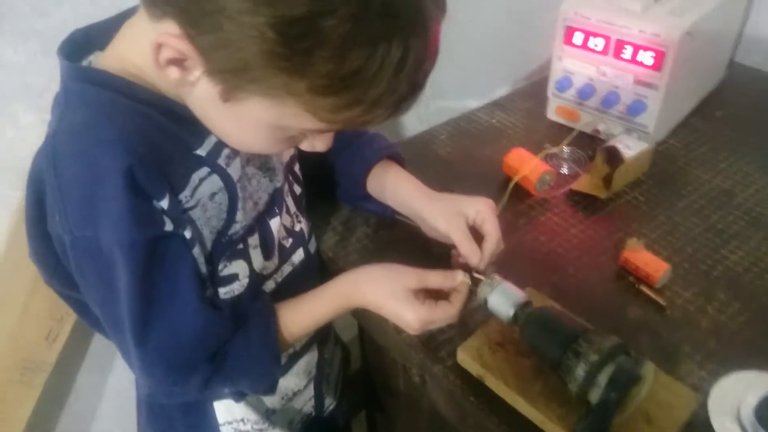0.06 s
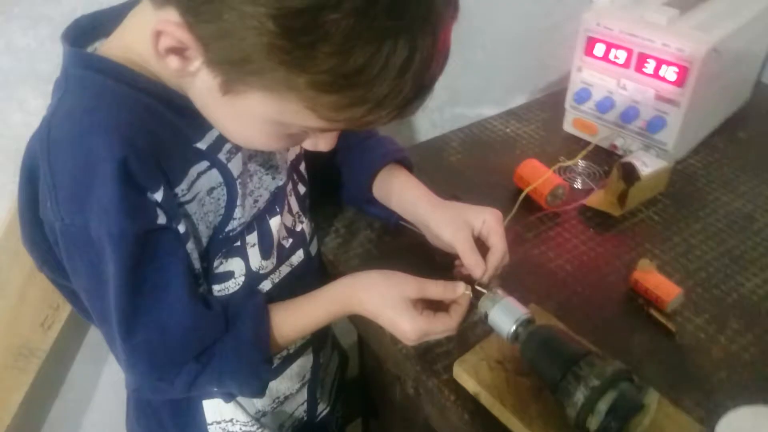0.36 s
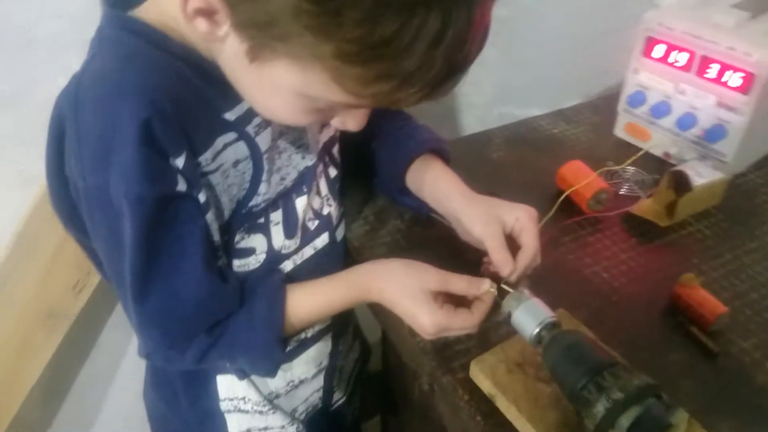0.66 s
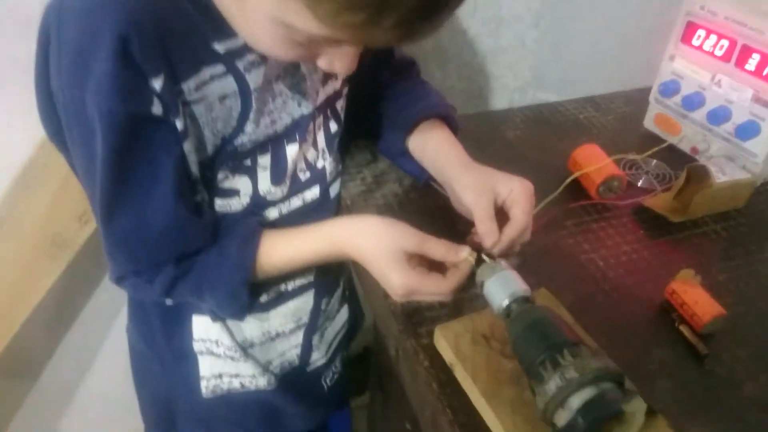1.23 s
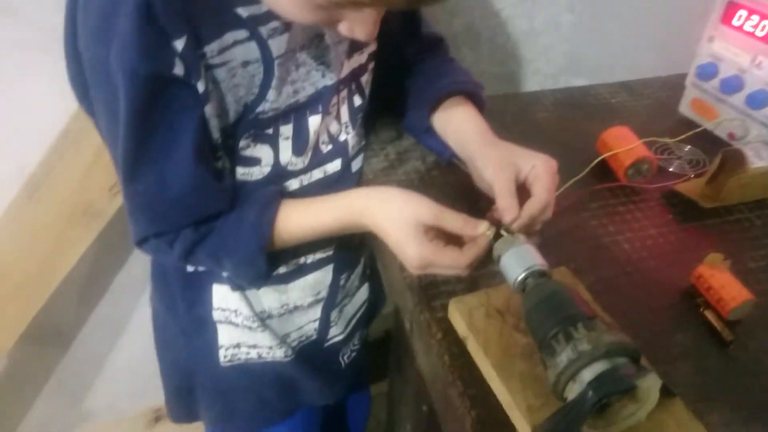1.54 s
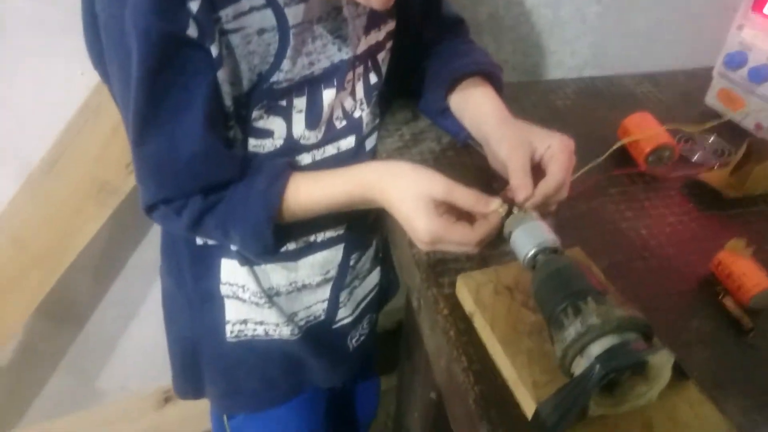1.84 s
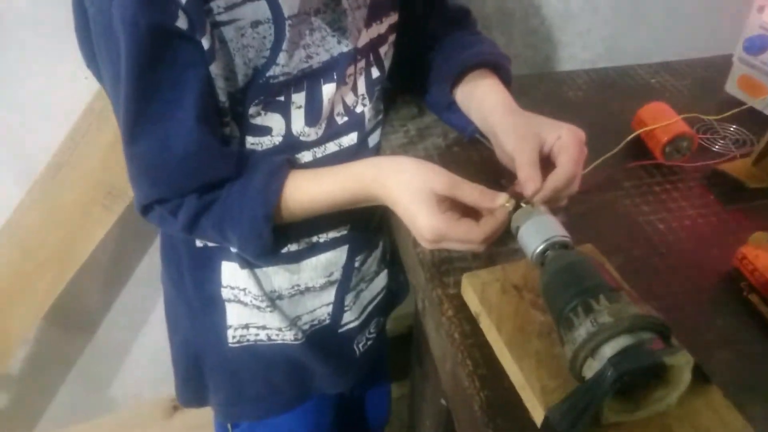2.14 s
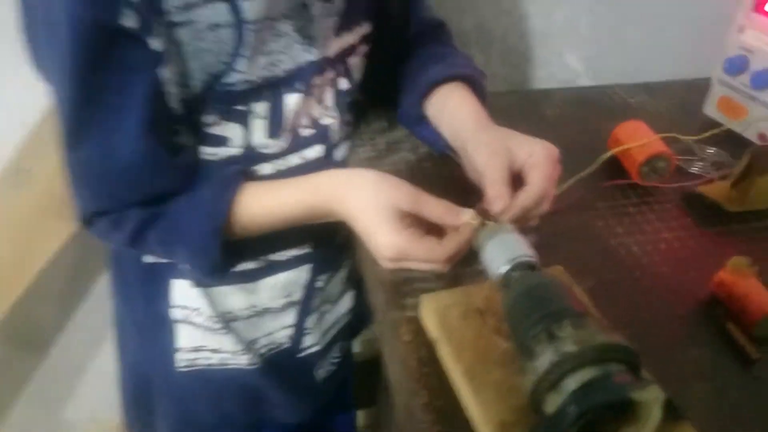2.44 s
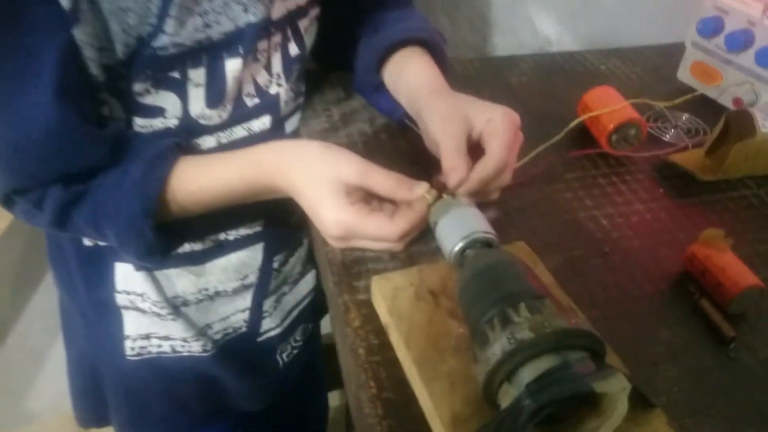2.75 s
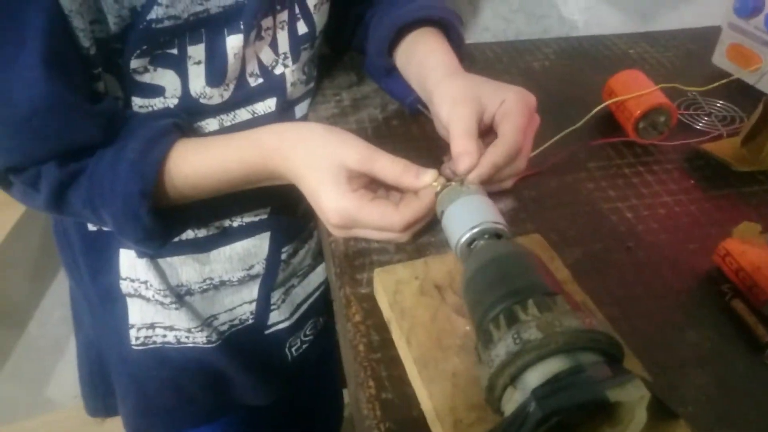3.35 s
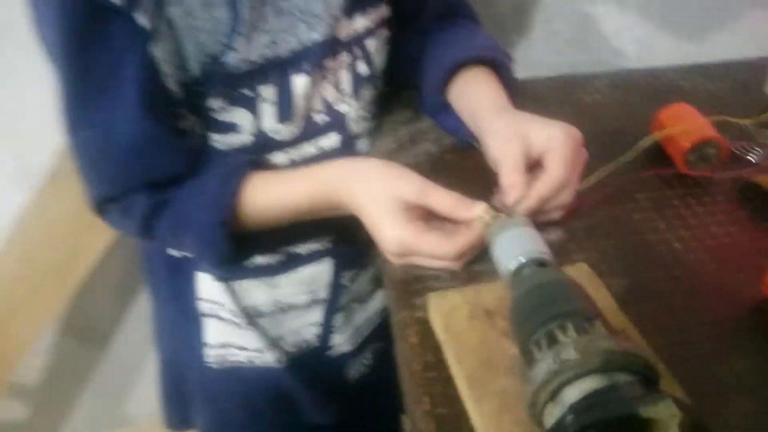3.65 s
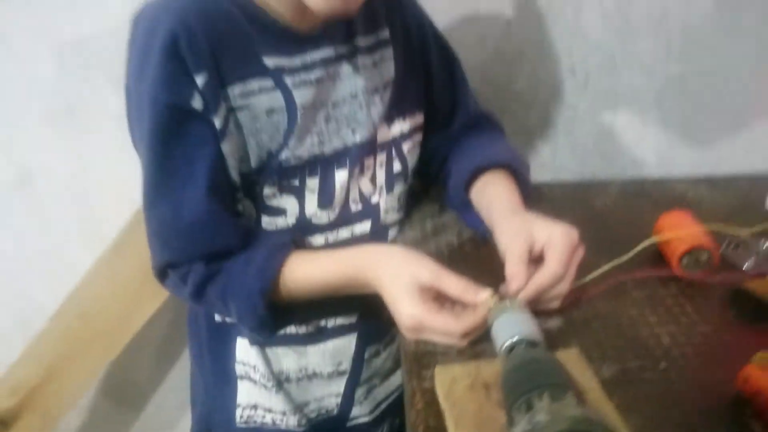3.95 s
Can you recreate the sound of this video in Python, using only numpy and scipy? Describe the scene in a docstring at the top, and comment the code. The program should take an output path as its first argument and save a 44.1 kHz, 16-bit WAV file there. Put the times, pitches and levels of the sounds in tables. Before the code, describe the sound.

Continuous hissing friction from a small piece pressed to a rotating tool tip, over faint whirring.

```python
"""A loud, bright friction rasp comes from a small part held to the tip of a geared motor tool on a bench.
The shafts slowly gather speed and modulate the friction noise, which excites broad resonances and
narrow metallic rings. Motor and gears hum at multiples of the rotation rate, over a faint rumble.
The moving microphones hear different colours left and right, and a limiter holds down the peaks."""
import sys
import numpy as np
from scipy import signal
from scipy.fft import rfft, irfft, next_fast_len
from scipy.io import wavfile
from scipy.ndimage import uniform_filter1d, minimum_filter1d, map_coordinates

SR = 44100
rng = np.random.default_rng(int(sys.argv[2]) if len(sys.argv) > 2 else 0)


def to_wav(sig):
    """Store sig (one row per channel, or 1-D mono) as 16-bit WAV at the path in sys.argv[1].

    Samples outside -1..1 are clipped; the rate is SR.
    """
    pcm = np.clip(np.atleast_2d(sig), -1, 1) * 32767
    pcm = np.round(pcm).astype(np.int16)
    wavfile.write(sys.argv[1], SR, pcm.T)  # frames by channels


N = 176400
GEAR_RATIO = 0.287  # turns of the gear shaft per motor turn


def amp(db):
    """Amplitude ratio of a level in decibels."""
    return 10 ** (np.asarray(db) / 20)


def unit(x):
    """Normalisation to an rms of 1."""
    return x / np.sqrt(np.mean(x ** 2) + 1e-20)


def along(rows, hz, column=1):
    """Interpolation of one table column on a logarithmic frequency axis."""
    columns = np.transpose(rows)
    return np.interp(np.log(hz + 1), np.log(columns[0] + 1), columns[column])


def curve(rows):
    """Linear interpolation of (seconds, value) rows to one value per sample."""
    return np.interp(np.arange(N) / SR, *np.transpose(rows))


def wobble(rate):
    """Slow random modulation: a spline through `rate` Gaussian values a second."""
    return map_coordinates(rng.standard_normal(8192), [np.arange(N) * rate / SR], mode="wrap")


def filtered(x, response):
    """Zero-phase filtering: the spectrum is multiplied by a function of frequency."""
    size = next_fast_len(N + SR // 4)
    return irfft(rfft(x, size) * response(np.fft.rfftfreq(size, 1 / SR)), size)[..., :N]


def rumble():
    """Faint low noise, lumpy from amplitude modulation and mostly in antiphase between the microphones."""
    # Rumble spectrum. Each row: frequency in Hz, relative level in dB.
    spectrum = [(10, -19), (40, -1.5), (68, -1), (95, -4), (170, -7.5), (280, -23), (600, -58), (2000, -90)]
    antiphase = rng.standard_normal(N) * np.array([[-1], [1]])
    independent = amp(-3.5) * rng.standard_normal((2, N))
    noise = filtered(antiphase + independent, lambda hz: amp(along(spectrum, hz)))
    return amp(-55) * unit(noise * amp(5.5 * wobble(rate=22)))


def hum(turns):
    """Rotational orders: motor and gear tones lie at fixed multiples of the speed and rise with it."""
    # Envelopes of the motor's fundamental, the gear shaft's tone and the third-order whine.
    # Each row: time in seconds, level on the right in dB.
    motor_db = [(0, -57), (.18, -48), (.6, -44.5), (.67, -52), (.78, -43.5), (1.2, -52.5), (1.55, -51),
                (1.78, -50), (1.86, -44.5), (2.4, -45), (3.25, -48), (3.6, -53), (4, -56)]
    gear_db = [(0, -90), (2.1, -71), (2.9, -53), (3.35, -51), (3.48, -69), (3.65, -49.5), (4, -48)]
    whine_db = [(0, -50), (0.9, -48.5), (1.6, -50), (2.0, -51), (2.5, -47), (3.2, -45.5), (3.65, -43),
                (4, -40)]

    def tone(order, jitter_rad):
        """One order, roughened by random phase and amplitude modulation."""
        phase = 2 * np.pi * order * turns + jitter_rad * wobble(rate=45)
        return unit(np.sin(phase) * amp(2 * wobble(rate=15)))

    motor = amp(curve(motor_db)) * tone(1, jitter_rad=0.1)
    overtone = amp(-53) * tone(1.8, jitter_rad=0.49)
    gear = amp(curve(gear_db)) * tone(GEAR_RATIO, jitter_rad=0.22)
    whine = amp(curve(whine_db)) * unit(tone(3, jitter_rad=0.45) * amp(3 * wobble(rate=14)))
    sides = np.array([[-amp(-8)], [1]])  # weaker and inverted on the left
    return (motor + overtone + gear) * sides + whine * amp([[-18], [0]])


def mode(hz, width_hz):
    """A lightly damped mode driven by friction gives narrow-band noise around its natural frequency."""
    phase = 2 * np.pi * np.cumsum(hz) / SR
    return unit(wobble(width_hz) * np.sin(phase) + wobble(width_hz) * np.cos(phase))


def ringing():
    """Metal modes swell and fade as the contact changes; later the tip's close modes take over."""
    # The tip's modes. Each row: frequency in Hz at 3 seconds, relative level in dB.
    tip_modes = [(3235, -13), (3342, -1), (3455, -1), (3572, 0), (3685, -7)]
    # Their common envelope. Each row: time in seconds, gain in dB.
    tip_db = [(0, -60), (2.2, -50), (2.5, -30), (2.72, -26), (3.0, -29.5), (3.6, -28.5), (3.66, -22.5),
              (3.88, -22.5), (4, -25.5)]
    # Passing rings. Each row: time of the peak in seconds, duration above half amplitude in seconds,
    # frequency in Hz, drift in Hz per second, width in Hz, peak level in dB, left minus right in dB.
    rings = [(1.7, 4.5, 540, 0, 32, -55, -20), (0.3, 1.1, 1830, -20, 30, -37, -16),
             (0.3, 0.9, 2310, 0, 90, -36, -14), (0.35, 0.25, 3580, 0, 40, -28, -12),
             (0.88, 0.3, 9205, 0, 45, -26, 12), (1.3, 1.2, 1522, 0, 28, -41, -16),
             (1.5, 1.0, 3730, 0, 70, -30, -14), (1.6, 0.6, 2378, 0, 22, -26.5, -12),
             (2.05, 0.6, 2690, 0, 40, -36, -14), (2.0, 0.6, 2850, 0, 50, -36, -14),
             (2.2, 0.6, 2055, 70, 26, -36, -16), (2.55, 0.6, 2545, 0, 55, -34, -14),
             (3.45, 0.25, 9650, 0, 60, -28, 12), (3.6, 0.8, 2620, 0, 55, -35, -14)]
    t = np.arange(N) / SR
    tip_drift_hz = 55 * (t - 3)
    tip = sum(amp(db) * mode(hz + tip_drift_hz, width_hz=22) for hz, db in tip_modes)
    sound = tip * amp(curve(tip_db)) * amp([[-14], [0]])
    for peak_s, length_s, hz, drift, width_hz, db, pan_db in rings:
        swell = 0.5 ** ((2 * (t - peak_s) / length_s) ** 2)
        sides = amp([[min(pan_db, 0)], [min(-pan_db, 0)]])
        sound += amp(db) * swell * mode(hz + drift * (t - peak_s), width_hz) * sides
    return sound


def scraping(turns):
    """Two independent friction noises, amplitude-modulated by both shafts and by uneven contact."""
    motor_angle = 2 * np.pi * turns
    gear_angle = GEAR_RATIO * motor_angle
    throb = 1 + 0.26 * np.cos(motor_angle) + 0.058 * np.cos(gear_angle) + 0.092 * np.cos(2 * gear_angle)
    noise = rng.standard_normal((2, N))
    chatter = amp(0.65 * wobble(rate=64))
    return unit(noise * throb * chatter)


def reflections(x, ripple_db=2.6):
    """Interference of reflections, as random spectral peaks and dips that drift as the microphones move."""
    spectra = signal.stft(x, nperseg=2048)[2]
    ripple = uniform_filter1d(rng.standard_normal(spectra.shape), size=2, axis=1)  # over frequency
    ripple = uniform_filter1d(ripple, size=34, axis=2)  # over time
    return unit(signal.istft(spectra * amp(ripple_db * unit(ripple)))[1][:, :N])


def across_bands(curves, hz):
    """Linear interpolation over frequency between twelve time curves, one per band of the rasp."""
    # The bands, from low to high. Each entry: centre frequency in Hz.
    centres_hz = [800, 1600, 2050, 2600, 3050, 3550, 5100, 6750, 8200, 9700, 10500, 12300]
    weights = [np.interp(hz, centres_hz, pick) for pick in np.eye(len(curves))]
    return np.transpose(weights) @ np.array(curves)


def rasp(turns):
    """Source and filter: friction noise passes through the tool's resonances, which swell and drift."""
    # Colour at the microphones. Each row: frequency in Hz, left and right relative levels in dB.
    colour = [(100, -93, -97), (245, -85, -83), (320, -77, -75), (477, -80.5, -75.5), (610, -77.5, -73),
              (1050, -77, -76.5), (1364, -73.5, -65.5), (1870, -67, -61), (2070, -65.5, -66.5),
              (2356, -59, -57), (2680, -59, -52), (2814, -58.5, -59.5), (3166, -80, -61.5),
              (3367, -59, -50.5), (3680, -57.5, -48.5), (4100, -71, -62), (4570, -57.5, -63),
              (4890, -67.5, -67.5), (6220, -53.5, -57), (6350, -44.5, -85), (6700, -38.5, -81),
              (6915, -40.5, -70), (7720, -49.5, -61), (8140, -48.5, -70), (9000, -52, -82),
              (9430, -49.5, -65.5), (9840, -50, -60), (10730, -61, -64.5), (12600, -72, -68),
              (14100, -80, -72), (15300, -85, -76)]
    # Likeness of the two channels. Each row: frequency in Hz, correlation from -1 to 1.
    correlation = [(60, 0.51), (180, -0.44), (540, -0.73), (1630, -0.026), (4910, 0.089), (14800, -0.11)]
    # Paths of three resonances; the departure from the mean shifts the colour.
    # Each row: time in seconds, centre frequency in Hz.
    lower_centre = [(0.0, 3490), (0.82, 3470), (0.89, 3650), (1.36, 3640), (2.31, 3510), (2.35, 3670),
                    (2.68, 3510), (4.0, 3620)]
    upper_centre = [(0.0, 6770), (0.92, 6690), (1.11, 6720), (2.19, 6600), (2.39, 6780), (3.84, 6650),
                    (4.0, 6930)]
    treble_centre = [(0, 9300), (0.999, 10350), (1.5, 10050), (2.301, 9700), (2.999, 9440), (3.5, 9600),
                     (4, 9500)]
    # Band envelopes, each normalised in use. Each row: time in seconds, relative level in dB.
    base = [(0, -46), (1.0, -46), (1.9, -44), (2.7, -47), (3.4, -50), (3.7, -46.5), (4, -47)]
    low_mid = [(0.0, -34), (0.02, -32.5), (0.95, -33), (2.25, -32.5), (3.45, -35), (3.94, -31.5),
               (4.0, -32)]
    low_notch = [(0, -35.5), (1.0, -37), (1.7, -36.5), (2.3, -34.5), (2.8, -39.5), (3.5, -39.5),
                 (3.75, -38), (4, -36)]
    mid = [(0.0, -36), (0.9, -31.5), (1.4, -28), (1.55, -28.5), (1.68, -25.5), (1.85, -26.5), (2.1, -34),
           (2.5, -26.5), (2.95, -33), (3.4, -33.5), (3.7, -30), (4.0, -38)]
    high_notch = [(0.0, -42), (1.02, -45), (1.57, -39.5), (3.17, -44), (3.4, -48), (3.7, -36), (3.8, -40),
                  (4.0, -36.5)]
    lower_resonance = [(0.0, -29), (0.78, -30.5), (1.45, -28.5), (1.82, -26.5), (2.1, -30.5), (2.2, -30.5),
                       (2.27, -27.5), (2.5, -27), (2.7, -29.5), (2.97, -33.5), (3.6, -33.5), (3.66, -28),
                       (4.0, -29.5)]
    valley = [(0.0, -27), (0.02, -26.5), (1.88, -23.5), (2.08, -26.5), (2.28, -22.5), (3.34, -27.5),
              (3.89, -22), (4.0, -21.5)]
    upper_resonance = [(0.0, -21), (0.01, -18), (1.74, -18), (1.94, -15), (2.27, -20.5), (2.35, -13.5),
                       (2.42, -20), (2.47, -15.5), (2.82, -14.5), (2.87, -17), (3.41, -16), (3.6, -21.5),
                       (3.62, -32), (3.64, -24), (3.85, -20), (4.0, -26)]
    sizzle = [(0.0, -23), (0.05, -18), (1.66, -21), (2.14, -29), (2.16, -26), (2.44, -18.5), (2.47, -24),
              (2.74, -34), (3.62, -26), (3.65, -19.5), (3.89, -22.5), (4.0, -20.5)]
    treble = [(0.0, -18), (0.01, -21), (0.98, -24.5), (1.5, -18.5), (2.03, -20.5), (2.62, -15),
              (2.74, -17.5), (3.0, -15.5), (3.91, -22), (4.0, -18)]
    upper_treble = [(0.0, -37), (0.03, -28.5), (0.82, -34), (1.46, -25), (1.93, -32.5), (2.45, -30),
                    (3.35, -37), (3.99, -25), (4.0, -28)]
    fizz = [(0.0, -31), (0.04, -29), (0.11, -29), (0.56, -29), (1.7, -23), (2.02, -24.5), (3.56, -29),
            (3.78, -22), (3.89, -27), (4.0, -22)]
    common_bands = [base, low_mid, low_notch, mid, high_notch]
    left_bands = common_bands + [mid, valley, upper_resonance, sizzle, treble, upper_treble, fizz]
    right_bands = common_bands + [lower_resonance, valley, valley, valley, fizz, fizz, fizz]

    hz, frame_s, spectra = signal.stft(reflections(scraping(turns)), SR, nperseg=1024)
    per_frame = lambda rows: np.interp(frame_s, *np.transpose(rows))
    drift = lambda rows: per_frame(rows) - per_frame(rows).mean()
    swell = lambda bands: across_bands([unit(amp(per_frame(rows))) for rows in bands], hz)

    shift_hz = np.zeros((len(left_bands), len(frame_s)))
    shift_hz[[5, 7, 9]] = drift(lower_centre), drift(upper_centre), drift(treble_centre)
    colour_hz = np.abs(hz[:, None] - across_bands(shift_hz, hz))
    # The balance of in-phase and antiphase noise sets the correlation.
    angle = np.arccos(np.clip(along(correlation, hz), -1, 1))[:, None] / 2
    in_phase, antiphase = spectra * np.array([np.cos(angle), np.sin(angle)])
    left = (in_phase + antiphase) * amp(along(colour, colour_hz, column=1) + 0.63) * swell(left_bands)
    right = (in_phase - antiphase) * amp(along(colour, colour_hz, column=2) + 1.5) * swell(right_bands)
    return signal.istft(np.array([left, right]))[1][:, :N] * np.sqrt(SR / 2)


def scene():
    """Superposition: one rotation drives the rasp and the hum, and the rings and rumble add to them."""
    # Motor speed. Each row: time in seconds, speed in turns per second.
    motor_speed = [(0.0, 357.5), (0.5, 372.5), (1.0, 383.0), (1.5, 393.2), (2.0, 404.5), (2.5, 418.0),
                   (3.0, 427.0), (3.5, 441.2), (4.0, 451.0)]
    flutter = 1 + 0.0019 * wobble(rate=12)
    turns = np.cumsum(curve(motor_speed) * flutter) / SR
    return rasp(turns) + ringing() + hum(turns) + rumble()


def record(dry):
    """Peak limiting: each channel's gain dips briefly at its peaks, then a low-pass limits the band."""
    ceiling, window_s, cutoff_hz = 0.94, 0.002, 15380
    span = int(window_s * SR)
    needed_gain = np.minimum(1, ceiling / (np.abs(dry) + 1e-9))
    gain = uniform_filter1d(minimum_filter1d(needed_gain, span), span)
    return filtered(dry * gain, lambda hz: hz < cutoff_hz)


dry = scene()
out = record(dry)
to_wav(out)
```